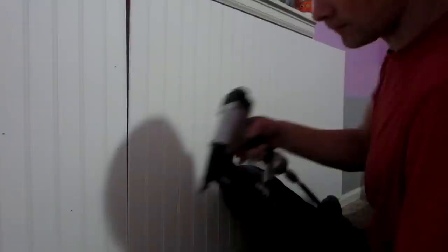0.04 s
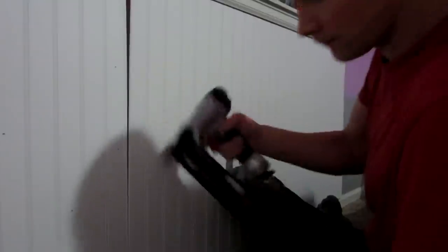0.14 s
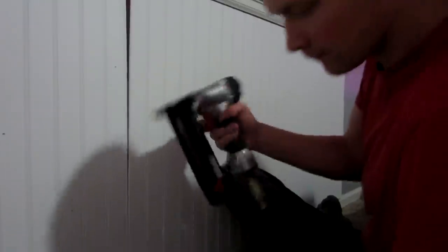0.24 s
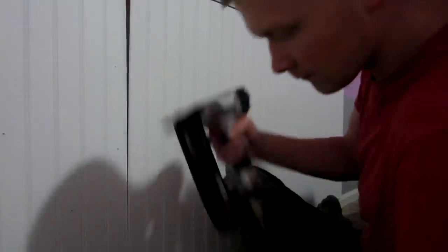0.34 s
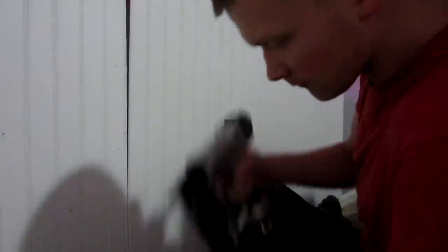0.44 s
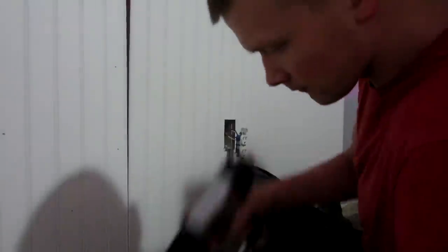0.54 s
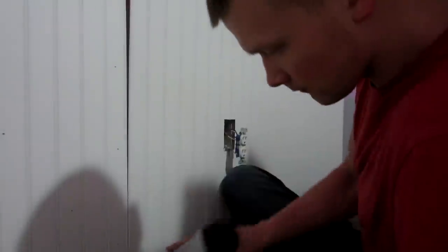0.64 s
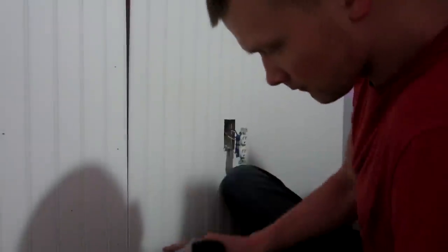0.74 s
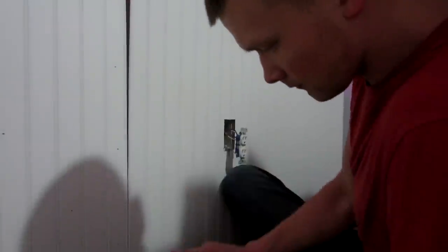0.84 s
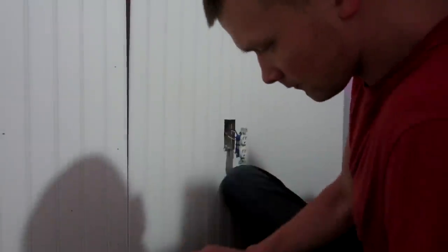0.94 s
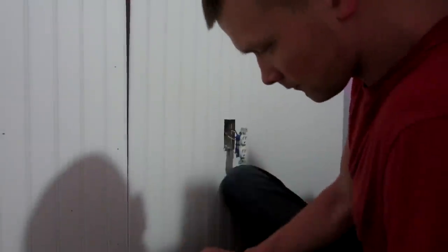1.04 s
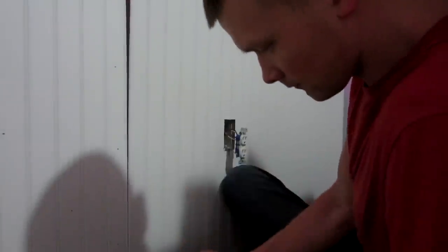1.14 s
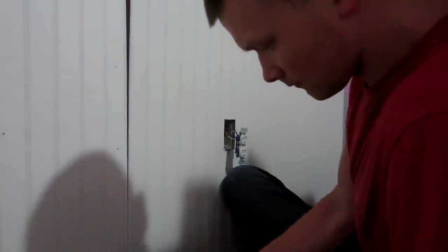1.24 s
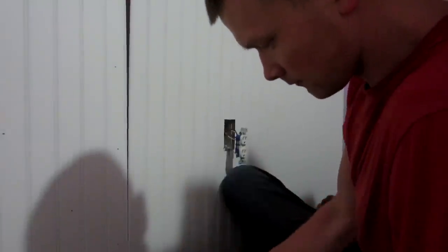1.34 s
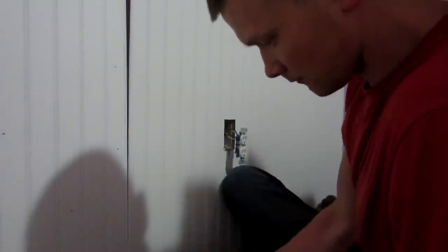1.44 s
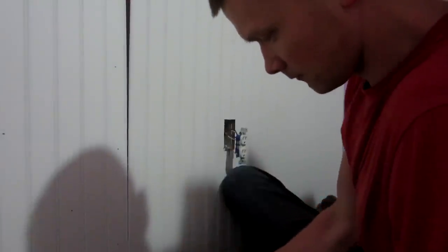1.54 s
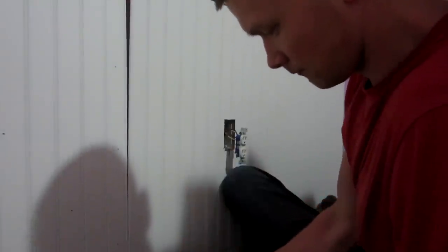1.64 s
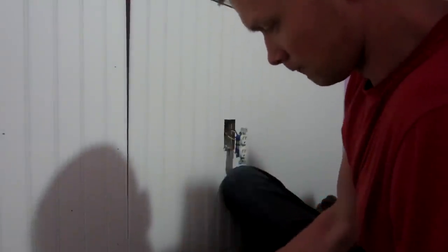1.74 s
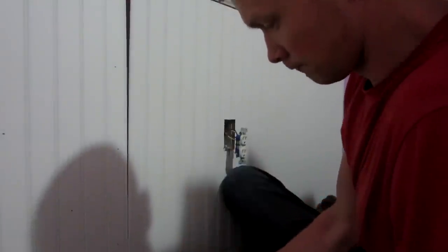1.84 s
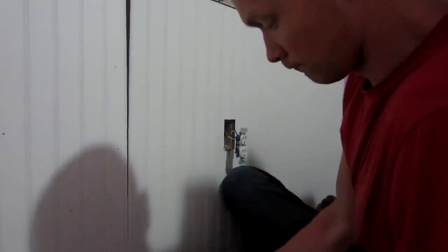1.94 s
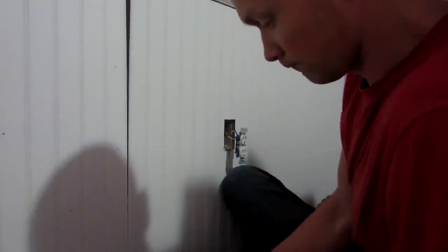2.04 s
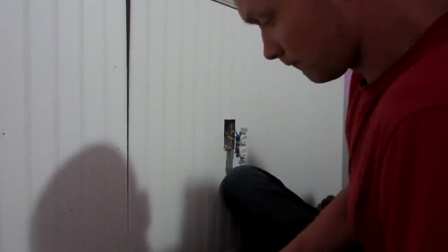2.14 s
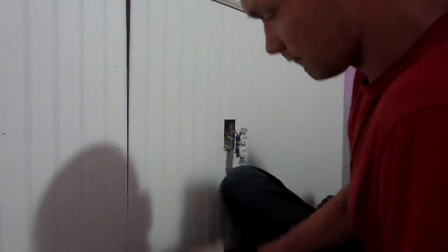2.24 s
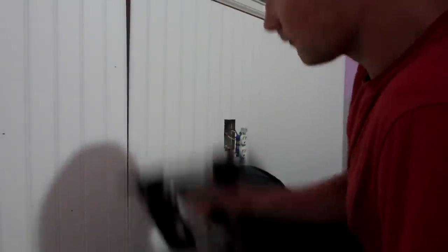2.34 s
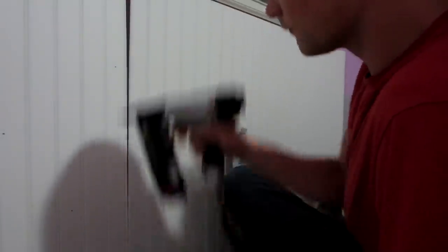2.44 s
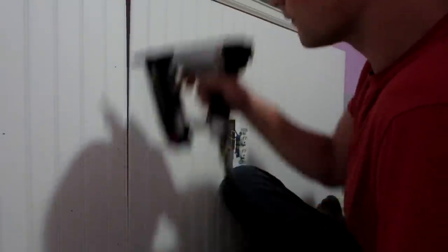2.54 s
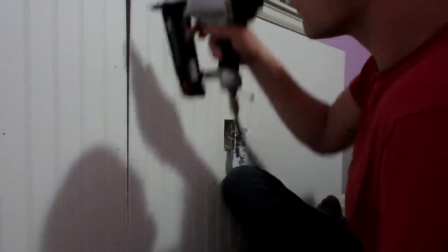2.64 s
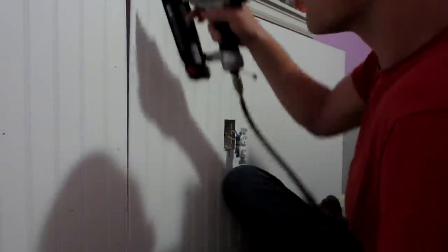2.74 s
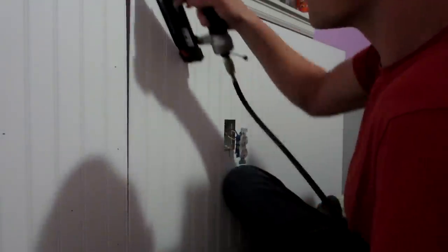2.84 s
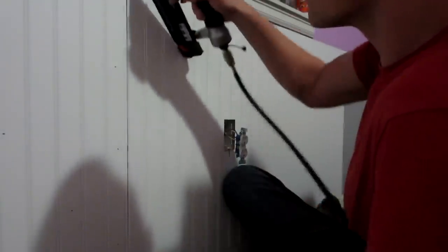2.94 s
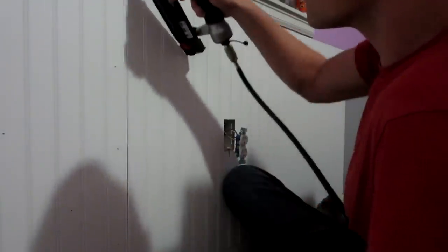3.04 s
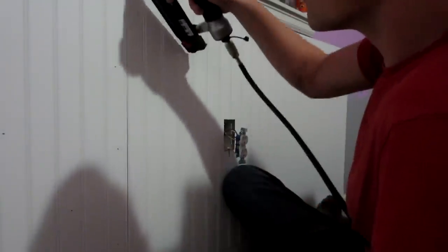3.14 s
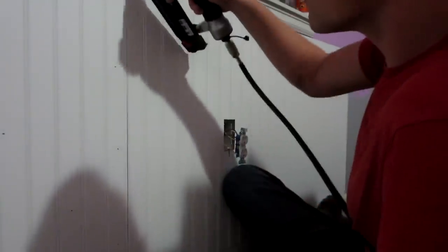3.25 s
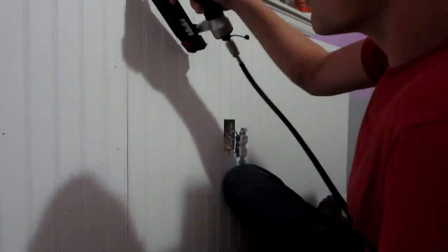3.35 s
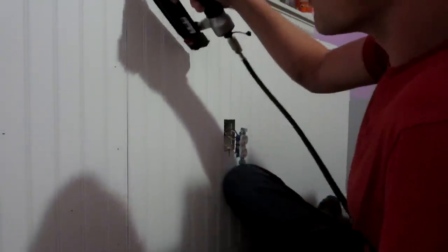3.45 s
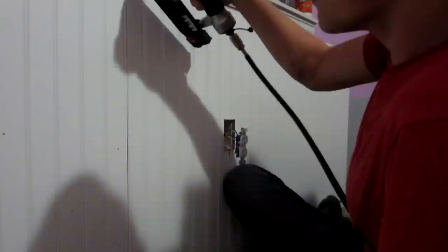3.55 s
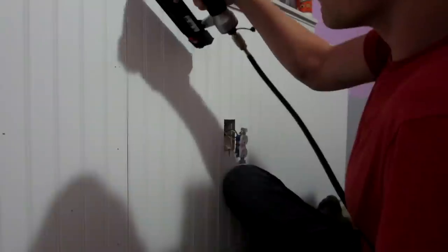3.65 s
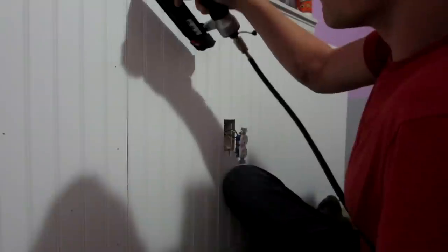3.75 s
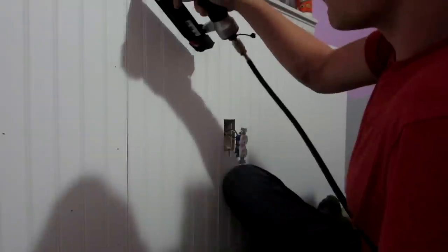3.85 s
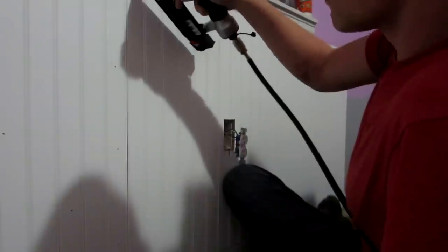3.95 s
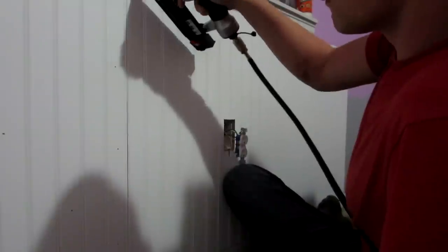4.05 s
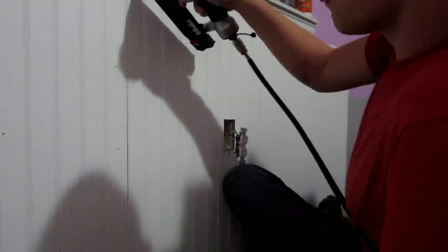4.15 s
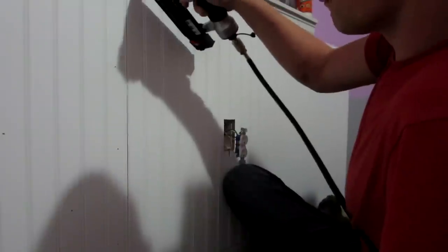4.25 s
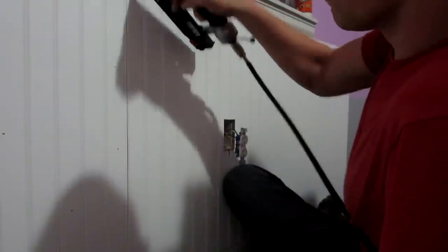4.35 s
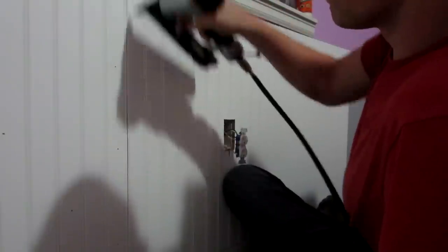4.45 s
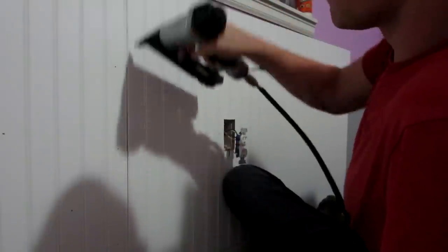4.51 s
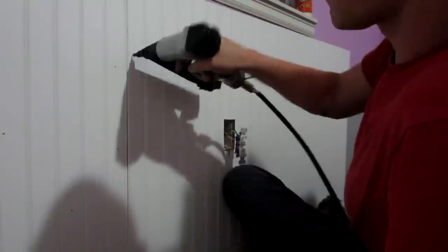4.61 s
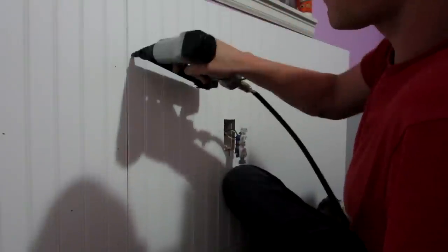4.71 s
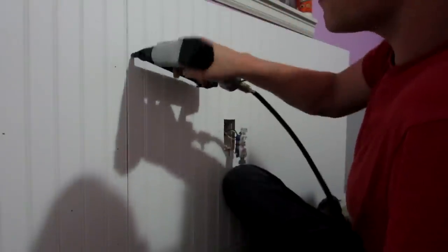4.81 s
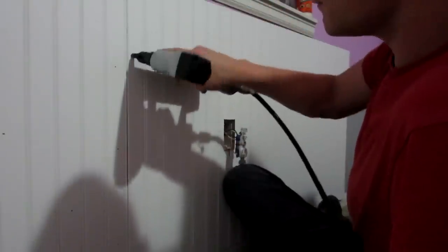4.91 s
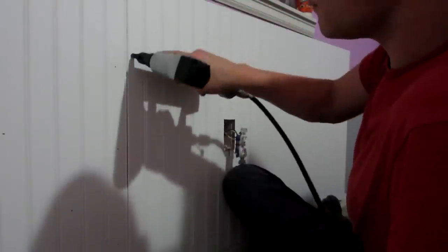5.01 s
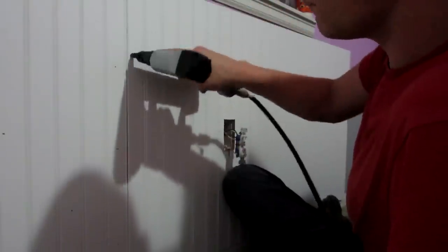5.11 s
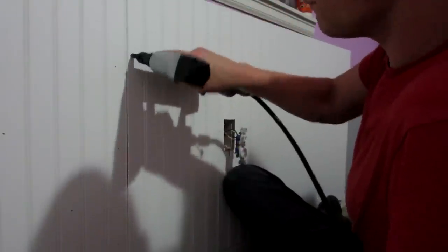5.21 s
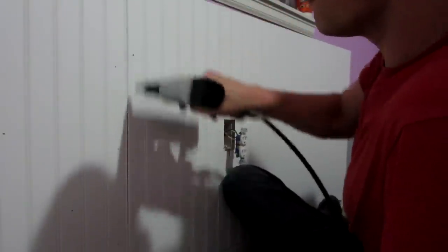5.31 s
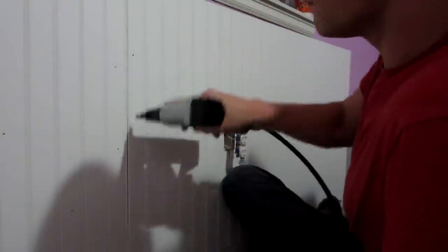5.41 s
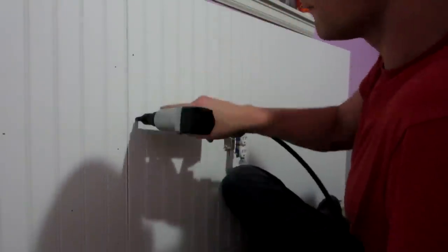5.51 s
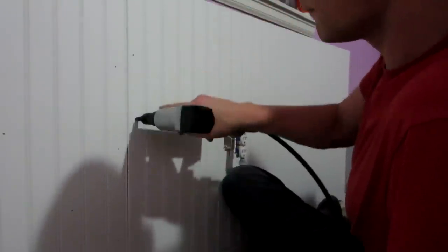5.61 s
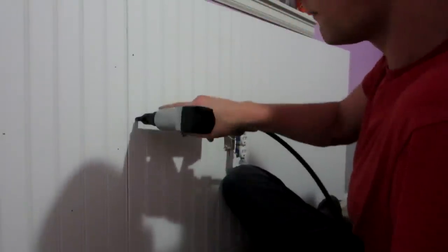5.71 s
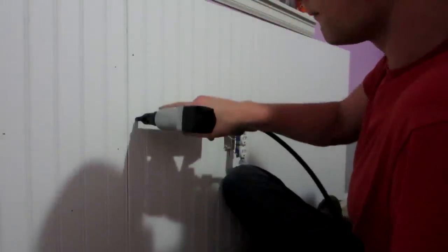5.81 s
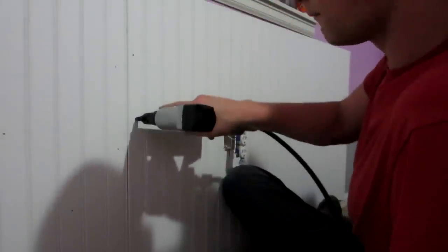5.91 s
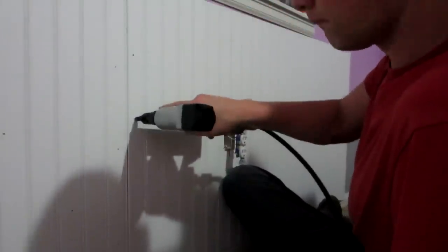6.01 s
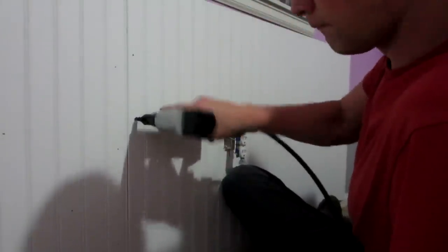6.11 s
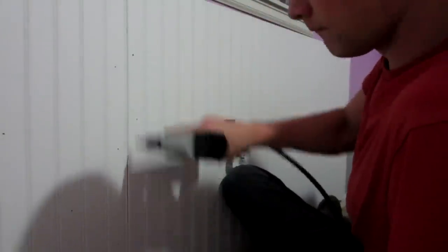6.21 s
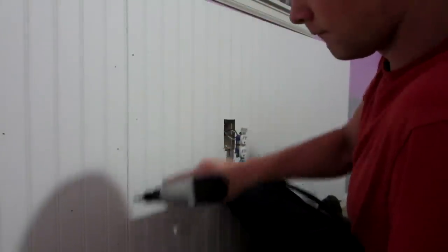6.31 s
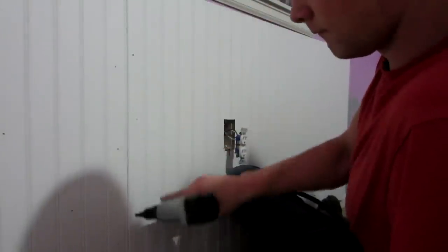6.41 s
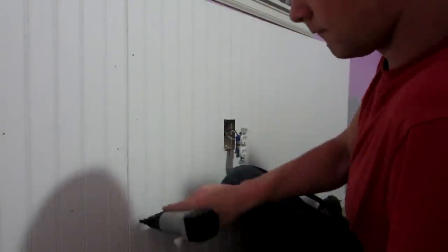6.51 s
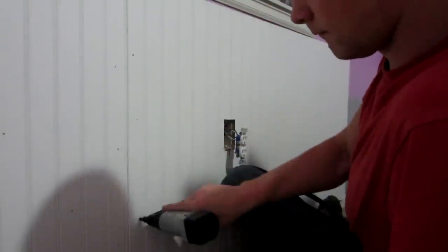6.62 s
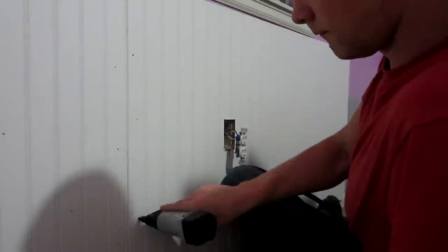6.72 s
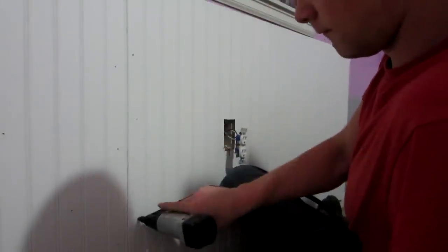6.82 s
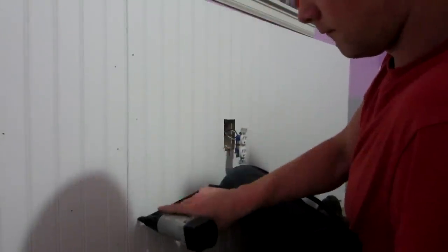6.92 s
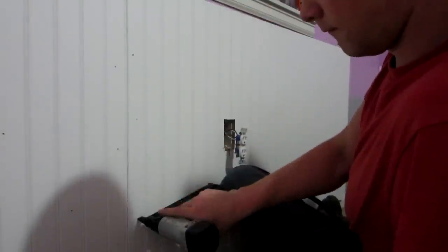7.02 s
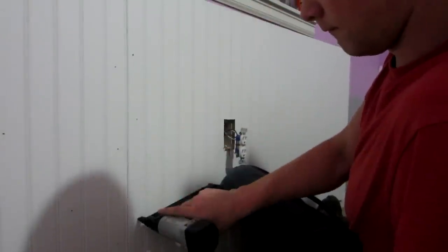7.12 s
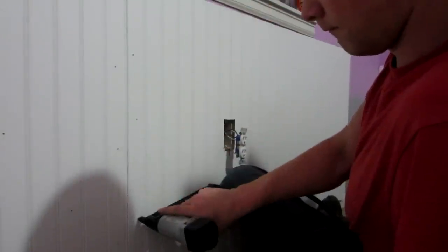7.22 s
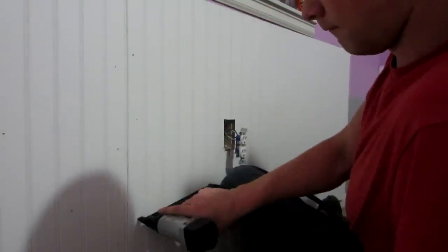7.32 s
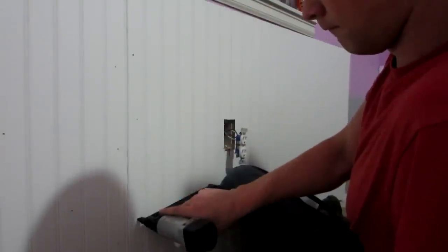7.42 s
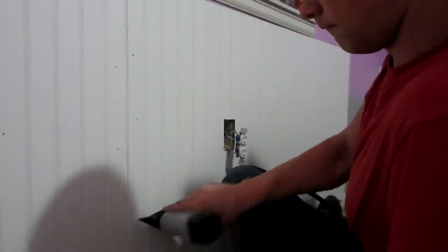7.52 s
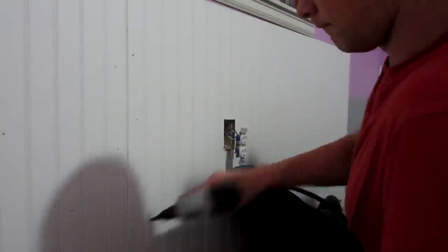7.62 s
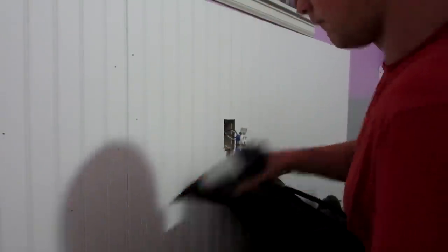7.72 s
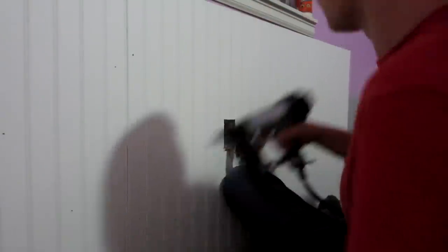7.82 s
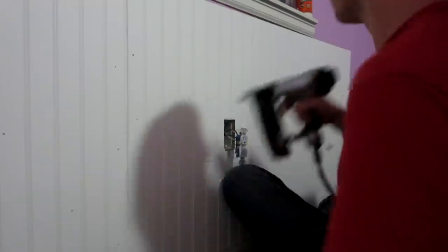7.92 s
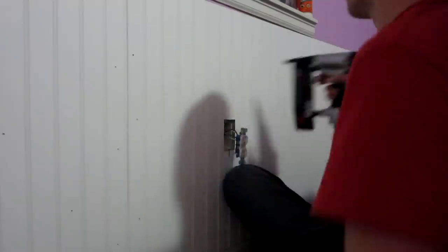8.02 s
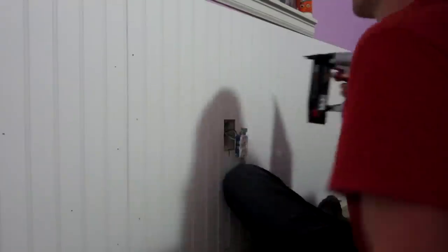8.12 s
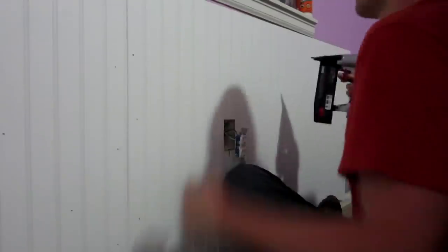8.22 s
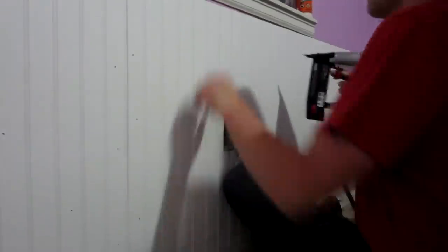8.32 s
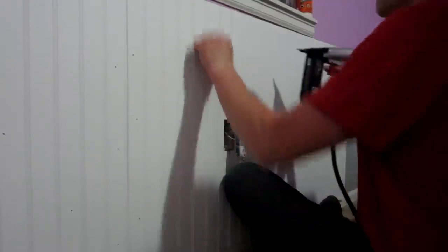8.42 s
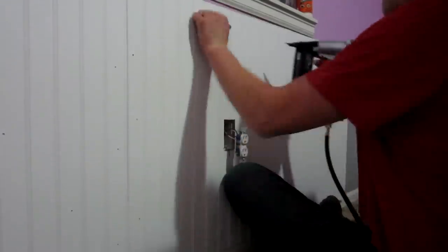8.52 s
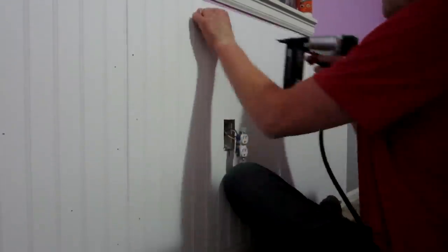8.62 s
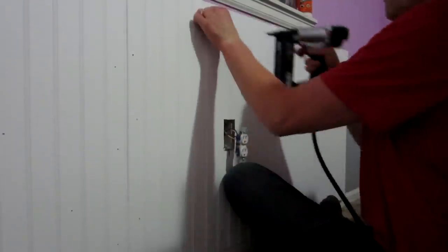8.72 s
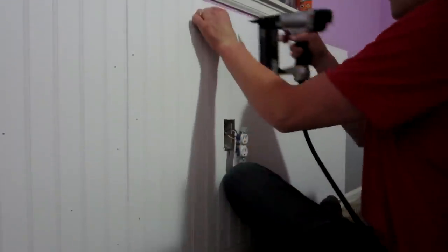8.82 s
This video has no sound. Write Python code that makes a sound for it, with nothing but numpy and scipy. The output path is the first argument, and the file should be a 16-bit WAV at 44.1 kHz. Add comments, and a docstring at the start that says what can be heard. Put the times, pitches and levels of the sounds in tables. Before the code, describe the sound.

A pneumatic nail gun fires five sharp shots into a wood wall panel, each with a hiss of air, amid light knocks.

```python
"""A small bare room, a stereo microphone a metre from a wood wall panel: a pneumatic nailer drives five nails.
At each shot the valve hisses, the driver strikes, then the exhaust blows and the piston thumps home.
Between shots the tool knocks, slides and clinks. The walls give a short echo.
Behind it lie house rumble, room murmur and cloth rustle, which sink at each shot and creep back."""
import sys
import numpy as np
from scipy import signal
from scipy.fft import rfft, irfft, next_fast_len
from scipy.io import wavfile
from scipy.ndimage import uniform_filter1d

SR = 44100
rng = np.random.default_rng(int(sys.argv[2]) if len(sys.argv) > 2 else 0)


def put_to_file(sound):
    """Save the sound as 16-bit audio at rate SR, in the file named by the first command-line argument."""
    columns = np.atleast_2d(sound).T  # one column per channel
    safe = np.clip(columns, -1, 1)
    whole_steps = np.round(safe * 32767)
    wavfile.write(sys.argv[1], SR, whole_steps.astype(np.int16))


N = 390726
T = np.arange(2 * SR // 5) / SR  # time within one event [s]

# driver hits the nail: (time [s], snap [dB], panel [dB], crack [dB], boom [dB], boom [Hz], pull [dB])
STRIKES = [(1.902, -2, -6, -12, -25, 300.9, 0), (4.2838, 1.5, -7, -15, -33.5, 191.7, -9.5),
           (5.1303, -0.5, -5.5, -10, -27.5, 202.6, -9), (6.0236, 0, -5, -10, -29, 195, -10.5),
           (7.43, -2, -9, -11, -24.5, 161.5, -13.5)]
# modes of the driver blade on the nail head: (frequency [Hz], level [dB], t60 [s])
BLADE_MODES = [(1140, -1.5, 0.0035), (1830, 0, 0.015), (2820, -15, 0.0089)]
# modes of the panel and tool body: (frequency [Hz], level [dB], t60 [s])
PANEL_MODES = [(480, -5, 0.0087), (527, -3.5, 0.006), (696, -5, 0.058), (827, -2.5, 0.039),
               (990, -7.5, 0.12), (1050, -1, 0.017), (1460, -2, 0.033), (1417, 1, 0.026), (1643, 2, 0.045),
               (2052, -7, 0.022), (2220, 0.5, 0.015), (2790, -4.5, 0.049), (3070, -14.5, 0.11)]
CAVITY_HZ, CAVITY_DB = 75, -30  # the hollow wall's deep answer, level relative to the blow

def driver_strikes(pull_s=0.0019):
    """The panel is drawn in for a moment; the blade snaps on the nail and the wall rings and booms."""
    out = np.zeros((2, N))
    for s, snap_db, panel_db, crack_db, boom_db, boom_hz, pull_db in STRIKES:
        add(out, s - pull_s, -undb(pull_db) * (T / pull_s) ** 2 * (T < pull_s))
        blow = undb(snap_db) * ring(BLADE_MODES) + undb(boom_db) * wall_boom(boom_hz)
        blow += undb(panel_db + CAVITY_DB) * wall_boom(CAVITY_HZ)
        wood_noise = band(noise([(1295, 1400, 0.54), (2820, 1600, 0.55)], 0.58), 1500, 4400)
        panel = 1.3 * ring(PANEL_MODES) + 1.045 * fade(.18) * wood_noise
        crack = (2 * fade(0.022) + fade(.05)) * noise(EXHAUST_BANDS)
        add(out, s, blow + undb(panel_db) * panel + undb(crack_db) * crack)
    return out

# modes of the panel and wall cavity: (frequency [Hz], level [dB], t60 [s])
WALL_MODES = [(69.5, -3.5, 0.6), (100, -2, 0.062), (151, 0, 0.072), (194, 1.5, 0.055), (230, -1, 0.062),
              (281.5, 1.5, 0.07), (392, 3, 0.038)]

def wall_boom(near_hz):
    """The hollow wall's low boom under a blow; rms 1 over its first 20 ms."""
    boom = ring(WALL_MODES, near_hz, octaves=0.51) * rise(0.00034)
    return boom / boom[:SR // 50].std()

# trigger valve opens: (time [s], level [dB], rise [s])
VALVES = [(1.880, -7, 0.0021), (4.2614, -10, 0.0011), (5.1057, -19, 0.0029), (5.9992, -21.5, 0.0024),
          (7.4082, -21.5, 0.0039)]
# air through the valve: (centre [Hz], width [Hz], level [dB])
VALVE_BANDS = [(2160, 720, 0), (5660, 1100, 0), (10900, 7000, 5)]

def valve_hiss():
    """Supply air rushes in until just after the driver bottoms out."""
    out = np.zeros((2, N))
    for (s, db, rise_s), (strike_s, *_) in zip(VALVES, STRIKES):
        since_cutoff = np.maximum(T - (strike_s - s) - .002, 0)
        rush = rise(rise_s) * np.exp(-since_cutoff / .006)
        add(out, s, undb(db) * rush * noise(VALVE_BANDS), left_db=1.5)
    return out

# exhaust port opens: (time [s], hiss [dB], low puff [dB])
EXHAUSTS = [(2.0319, -10, -8.5), (4.381, -10.5, -18.5), (5.2504, -8.5, -9), (6.155, -10.5, -10),
            (7.55, -11.5, -8)]
# escaping air, also the colour of the strike's crack: (centre [Hz], width [Hz], level [dB])
EXHAUST_BANDS = [(2330, 2200, -8.5), (6250, 5200, -2), (12600, 5400, 0.5)]

def exhaust(full_flow_s=0.025, vent_t60=0.22):
    """Air vents at full flow while the piston travels back, then the pressure bleeds away."""
    out = np.zeros((2, N))
    flow = rise(0.00035) * 1000. ** (-np.maximum(T - full_flow_s, 0) / vent_t60)
    for s, hiss_db, puff_db in EXHAUSTS:
        hiss = undb(hiss_db) * flow * noise(EXHAUST_BANDS, 0.49)
        puff = undb(puff_db) * fade(0.16, 0.0015) * noise([(537, 1000, 0)], 0.57)
        add(out, s, hiss + puff, left_db=1.5)
    return out

# piston lands: (time [s], level [dB], pitch [Hz], boom [dB])
PISTON_RETURNS = [(2.069, -6.5, 766, -28.5), (4.413, -6.5, 900, -33), (5.284, -3.5, 730, -26.5),
                  (6.189, -5.5, 796, -29), (7.586, -8.5, 900, -29)]

def piston_thumps(boom_hz=266):
    """The piston thumps home and shakes tool, panel and wall cavity."""
    out = np.zeros((2, N))
    for s, db, hz, boom_db in PISTON_RETURNS:
        boom = undb(boom_db) * wall_boom(boom_hz)
        panel = 0.5 * ring(PANEL_MODES, hz, octaves=0.4)
        clack = fade(0.093, 0.0012) * band(noise([(hz, 1100, 0)], .8), hz, 2600)
        cavity = undb(CAVITY_DB - 3.5) * wall_boom(CAVITY_HZ)
        add(out, s, boom + undb(db) * (panel + clack + cavity))
    return out

# tool, hose and hands touch panel or floor: (time [s], panel [dB], pitch [Hz], tick [dB])
KNOCKS = [(0.102, -30, 450, -41), (0.3, -19, 704, -51), (0.332, -27, 2500, -33), (0.345, -42, 401, -25.5),
          (0.44, -19.5, 2250, -26), (0.519, -43, 431, -41), (0.563, -31, 2490, -40),
          (0.613, -46, 526, -35.5), (1.167, -17.5, 1350, -44), (1.179, -28, 1450, -27),
          (1.185, -22.5, 1000, -17), (1.259, -20, 1160, -33), (1.274, -26, 520, -36),
          (1.449, -29, 1702, -31.5), (1.851, -40, 2940, -30.5), (2.447, -38.5, 943, -73),
          (2.643, -46.5, 1590, -67), (2.704, -42, 2350, -49), (2.835, -41.5, 1560, -71),
          (2.89, -44, 1760, -49), (2.927, -28, 1380, -37), (3.152, -34.5, 1110, -43),
          (3.173, -36.5, 1003, -46), (3.291, -41, 401, -59), (3.459, -56, 425, -59),
          (3.65, -48, 475.5, -61), (3.73, -45.5, 1010, -56), (3.848, -47.5, 1740, -57.5),
          (4.006, -42, 431, -49.5), (4.043, -47, 435, -53), (4.09, -55, 533, -68.5),
          (4.704, -36.5, 640, -64.5), (4.764, -36, 694, -51.5), (4.905, -48.5, 474, -56.5),
          (5.555, -33, 1306, -36), (5.582, -33.5, 875, -40), (6.685, -41.5, 1140, -62.5),
          (6.699, -45, 784, -42.5), (6.803, -41.5, 1558, -51.5), (7.153, -51.5, 1350, -57),
          (7.947, -48, 432, -75), (8.09, -62.5, 2500, -64.5), (8.196, -54.5, 1288, -56.5),
          (8.264, -61, 2004, -72.5), (8.522, -56.5, 665, -68.5), (8.699, -58, 885, -64),
          (8.729, -60.5, 1300, -75), (8.81, -49.5, 402, -84)]

def knocks():
    """Each light contact rings the panel and scrapes on it, with a bright tick on top."""
    out = np.zeros((2, N))
    for s, panel_db, hz, tick_db in KNOCKS:
        panel = 0.7 * ring(PANEL_MODES, hz, octaves=7.1)
        scrape = 0.8 * fade(0.071, 0.00043) * noise([(hz, 1.1 * hz, 0)], 1.0)
        knock = band(panel + scrape, hz, 1.7 * hz)
        tick = fade(0.026, 0.00037) * band(noise([(6600, 6200, 0)], .65), 9800, 9000)
        add(out, s, 2 * (undb(panel_db) * knock + undb(tick_db) * tick))
    return out

# bumps of tool and knee: (time [s], level [dB], boom [Hz])
BUMPS = [(0.136, -24, 70), (0.298, -28, 350), (1.179, -21, 210), (1.26, -23, 158), (1.268, -24.5, 71.5),
         (2.931, -41.5, 197), (3.164, -41.5, 175), (3.182, -37, 70.5), (4.766, -39, 186), (5.562, -40, 110),
         (6.697, -49.5, 183), (6.807, -41.5, 129), (7.439, -21, 135)]

def bumps():
    """Heavier contacts set the wall booming."""
    out = np.zeros((2, N))
    for s, db, hz in BUMPS:
        add(out, s, undb(db) * wall_boom(hz))
    return out

# small steel parts touch: (time [s], level [dB], main ring [Hz])
CLINKS = [(0.808, -29.5, 4450), (0.88, -17.5, 4330), (1.046, -10.5, 4200), (3.019, -24, 7040),
          (3.063, -25.5, 7200)]
# their resonances: (centre [x main ring], width [x main ring], level [dB])
STEEL_BANDS = [(.92, 0.14, 6), (1.05, 0.14, 8), (1.18, 0.15, -15), (1.9, 0.2, -10), (2.85, .3, -5),
               (3.3, .25, -16)]

def clinks():
    """A short, rough tap excites the resonances of a steel part."""
    out = np.zeros((2, N))
    for s, db, hz in CLINKS:
        tap = fade(0.02, .0001) * (1 + rng.standard_normal((2, len(T))))
        steel = sum(undb(level) * band(band(tap, k * hz, width * hz), k * hz, 2 * width * hz) / width
                    for k, width, level in STEEL_BANDS)
        add(out, s, undb(db) * (steel / np.abs(steel).max() + 0.15 * band(tap, 6000, 10000)))
    return out

# the tool's nose slides: (time [s], length [s], level [dB])
SLIDES = [(3.629, .33, -54)]
# resonances of the rubbed panel: (centre [Hz], width [Hz], level [dB])
SLIDE_BANDS = [(970, 120, -1.5), (1420, 150, -1), (1800, 250, -5.5)]

def nose_slide():
    """The nose rubs over the panel with an uneven grip, swelling and fading."""
    out = np.zeros((2, N))
    for s, length, db in SLIDES:
        swell = np.sqrt(np.sin(np.pi * np.clip(T / length, 0, 1)).clip(0))
        grip = undb(4.0 * wander(25.)[:len(T)])
        add(out, s, undb(db) * swell * grip * noise(SLIDE_BANDS, 0.69))
    return out

# echo of the bare room: (centre [Hz], t60 [s], level [dB])
ROOM_BANDS = [(126, 0.77, -13.5), (271, 0.27, -1.5), (487, 0.18, -20.5), (1120.5, 0.56, -8.5),
              (1950, 0.5, -14.5), (3860, 0.56, -16.5), (8050, 0.41, -14.5), (13200, 0.19, -21.5)]

def room_echo(direct, onset_s=0.0032, wide_hz=3800):
    """Dense reflections build quickly; each band dies at its own rate, the bass alike left and right."""
    t = np.arange(2 * SR // 3) / SR
    echo = np.zeros((2, len(t)))
    for hz, t60, db in ROOM_BANDS:
        tail = band(band(rng.standard_normal((2, len(t))), hz, 1.5 * hz), hz, 1.5 * hz)
        tail *= (1 - np.exp(-t / onset_s)) * 1000. ** (-t / t60)
        mid, side = tail / np.linalg.norm(tail[0])
        spread = min(np.sqrt(hz / wide_hz), 1)
        echo += undb(db) * np.sqrt(hz / SR) * 2 * stereo(mid, spread * side)
    return signal.oaconvolve(direct.mean(axis=0)[None], echo, axes=1)[:, :N]

# spectra of house rumble, room murmur and cloth rustle: (frequency [Hz], relative density [dB])
RUMBLE_SPECTRUM = [(15, -60), (25, -26.5), (64, -6), (87, 7), (156, -7), (199, -1.5), (286, -18),
                   (325, -23), (400, -17), (520, -52.5), (880, -120)]
MURMUR_SPECTRUM = [(150, -33.5), (250, -2.5), (371, -16.5), (486, -6.5), (793, -17.5), (927, -14.5),
                   (3000, -39), (3900, -55.5), (6600, -120)]
RUSTLE_SPECTRUM = [(1180, -24.5), (2000, 0.5), (2380, -1.5), (4120, -10.5), (6880, -12), (13400, -17),
                   (16000, -19)]
# cloth moving, before the background sinks: (time [s], level [dB])
CLOTH_LEVELS = [(0.08, -58.5), (0.11, -47), (0.31, -41.5), (0.52, -53), (0.89, -49.5), (1.16, -64.5),
                (1.35, -57.5), (1.84, -65.5), (2.691, -48.5), (3.05, -45.5), (3.25, -58.5), (3.8, -62),
                (4.24, -64), (4.801, -49.5), (5.8, -55.5), (7.0, -68), (8.1, -50.5), (8.86, -52.5)]

def background(rumble_db=-35, murmur_db=-47, still_cloth_db=-59.5):
    """Low house rumble, bright cloth rustle and a mid murmur that swells as the cloth moves."""
    cloth_db = np.interp(np.arange(N) / SR, *np.transpose(CLOTH_LEVELS))
    swell_db = 0.44 * (cloth_db - still_cloth_db)
    rustle = undb(cloth_db) * wash(RUSTLE_SPECTRUM, .55, flicker_db=1.5, flicker_hz=40)
    rumble = undb(rumble_db) * wash(RUMBLE_SPECTRUM, .89, flicker_db=1.0, flicker_hz=10)
    murmur = undb(murmur_db + swell_db) * wash(MURMUR_SPECTRUM, .78, flicker_db=1.3, flicker_hz=7.5)
    return rumble + murmur + rustle

# the background sinks at each shot: (time [s], depth [dB])
SINKS = [(1.95, -22), (4.33, -22.5), (5.18, -24.5), (6.07, -27.5), (7.48, -31.5)]

def sinking(drop_s=0.1, creep_db_per_s=6.5):
    """Gain of the background: a quick drop at each shot, a steady climb afterwards."""
    t, db = np.arange(N) / SR, np.zeros(N)
    for s, depth_db in SINKS:
        climb_db = np.minimum(depth_db + creep_db_per_s * (t - s), 0)
        db += np.clip((t - s) / drop_s, 0, 1) * (climb_db - db)
    return undb(db)

def undb(db):
    """Decibels to gain."""
    return 10 ** (np.asarray(db) / 20)

def band(x, hz, width):
    """Two-pole band-pass, gain 1 at the centre."""
    return signal.lfilter(*signal.iirpeak(min(hz, .4 * SR), hz / width, fs=SR), x)

def rise(rise_s):
    """Exponential approach from 0 to 1."""
    return 1 - np.exp(-T / rise_s)

def fade(t60, rise_s=0.00092):
    """Quick rise, exponential fall."""
    return rise(rise_s) * 1000. ** (-T / t60)

def stereo(mid, side):
    """Mid and side to left and right."""
    return np.array([mid + side, mid - side])

def ring(modes, near_hz=None, octaves=1.0, scatter_db=6.5):
    """One blow: modes near the struck spot's pitch speak most; strength, tuning and phase vary; peak 1."""
    hz, db, t60 = np.transpose(modes)[:, :, None]
    strength, detune, phase = rng.standard_normal((3, len(modes), 1))
    if near_hz:
        db = db - 6 * (np.log2(hz / near_hz) / octaves) ** 2
    cycles = hz * (1 + 0.05 * detune) * T + .15 * phase
    partials = undb(db + scatter_db * strength) * np.sin(2 * np.pi * cycles) * 1000. ** (-T / t60)
    y = partials.sum(axis=0) * rise(0.00019)
    return y / np.abs(y).max()

def noise(bands, likeness=0.55):
    """Noise through wide resonances, identical left and right at likeness 1; rms 0.5."""
    mid, side = (sum(undb(db) * band(rng.standard_normal(len(T)), hz, width) / np.sqrt(width)
                     for hz, width, db in bands) for _ in range(2))
    y = stereo(likeness * mid, (1 - likeness) * side)
    return y / y.std() / 2

def wander(rate_hz):
    """Random steps, smoothed twice; spread 1."""
    hold = int(SR / rate_hz)
    steps = np.repeat(rng.standard_normal(N // hold + 1), hold)
    y = uniform_filter1d(uniform_filter1d(steps, hold), hold)[:N]
    return y / y.std()

def wash(spectrum, likeness, flicker_db, flicker_hz):
    """Continuous stereo noise of a given spectrum with a flickering level; rms 1."""
    hz, db = np.transpose(spectrum)
    size = next_fast_len(N)
    bin_hz = np.arange(size // 2 + 1) * SR / size
    gain = undb(np.interp(np.log(bin_hz + 1), np.log(hz), db, left=-90, right=-90))
    mid, side = irfft(rfft(rng.standard_normal((2, size))) * gain, size)[:, :N]
    y = stereo(likeness * mid, (1 - likeness) * side) * undb(flicker_db * wander(flicker_hz))
    return y / y.std()

def add(track, s, sound, left_db=0.):
    """Mixes a sound in at time s, louder on the left by left_db."""
    start = int(s * SR)
    n = min(len(T), N - start)
    track[:, start:start + n] += (sound * undb([[left_db / 2], [-left_db / 2]]))[:, :n]

def scene():
    """Tool, echo and background; the left microphone is nearer, so the right lags two samples."""
    direct = driver_strikes() + valve_hiss() + exhaust() + piston_thumps()
    direct += knocks() + bumps() + clinks() + nose_slide()
    left, right = direct + room_echo(direct) + sinking() * background()
    return np.array([left, np.concatenate([right[:2], right[:-2]])])

def record(dry, top_hz=15900):
    """The input stage clips just under full scale and the top is cut."""
    lowpass = signal.ellip(8, .2, 60, top_hz, fs=SR, output="sos")
    return signal.sosfilt(lowpass, np.clip(dry, -.96, .96))

dry = scene()
out = record(dry)
put_to_file(out)
```